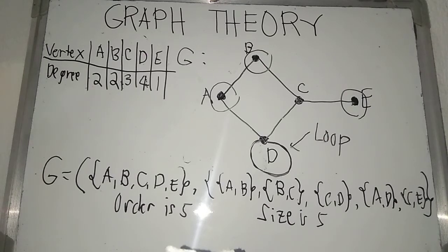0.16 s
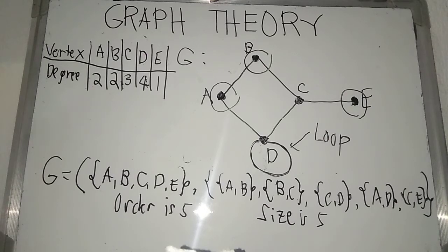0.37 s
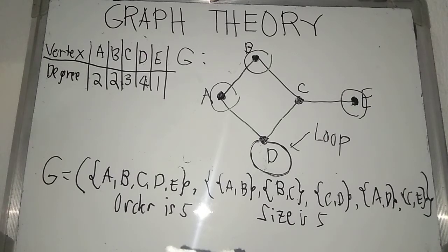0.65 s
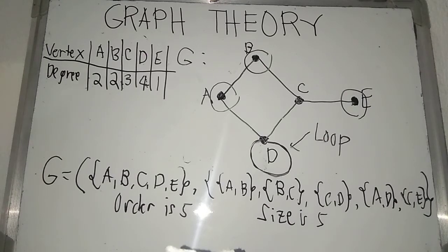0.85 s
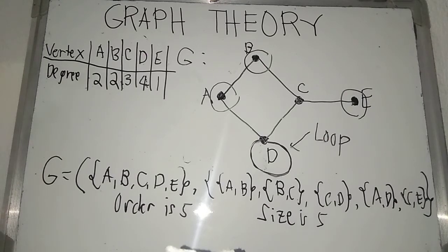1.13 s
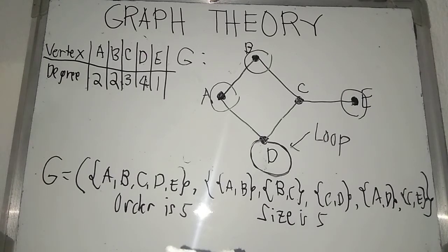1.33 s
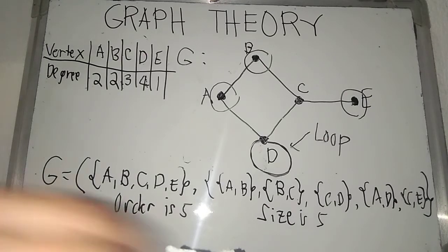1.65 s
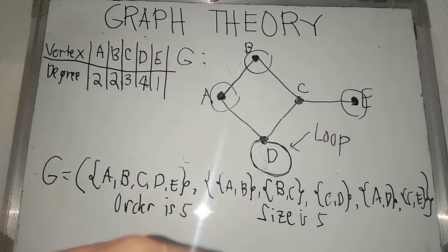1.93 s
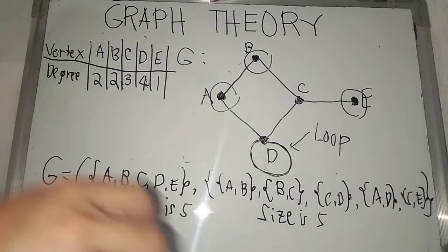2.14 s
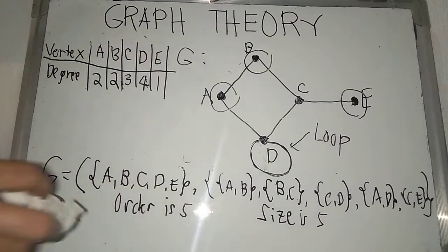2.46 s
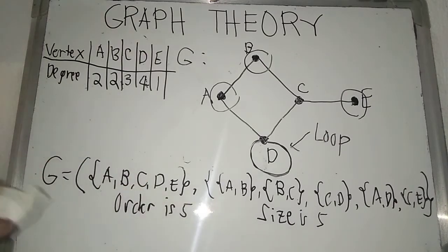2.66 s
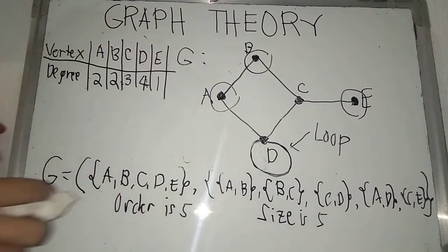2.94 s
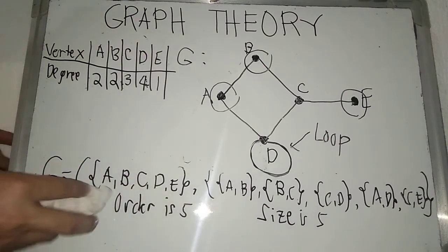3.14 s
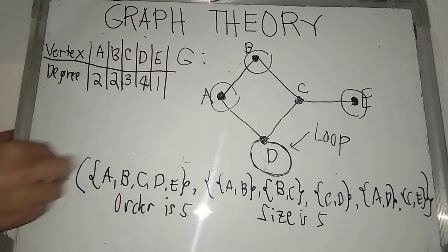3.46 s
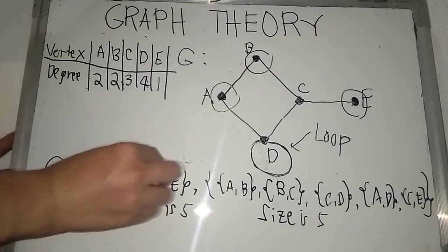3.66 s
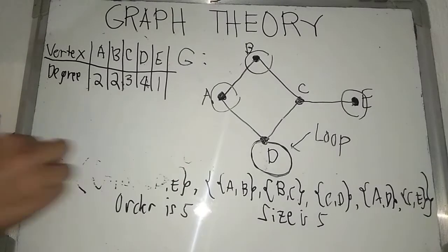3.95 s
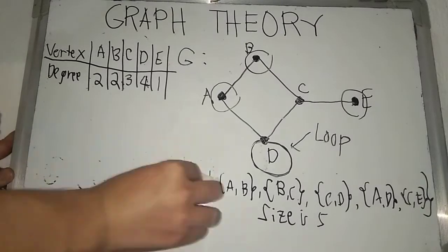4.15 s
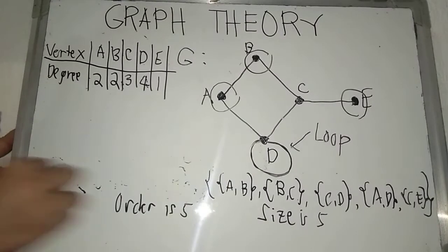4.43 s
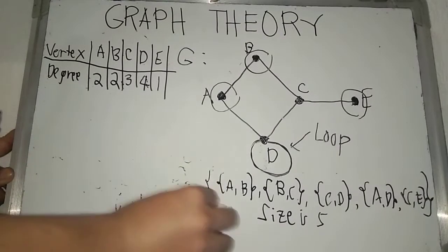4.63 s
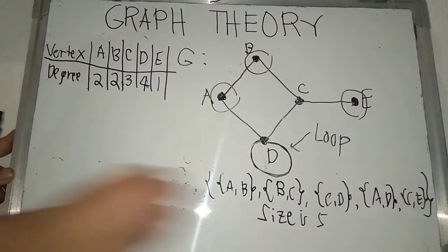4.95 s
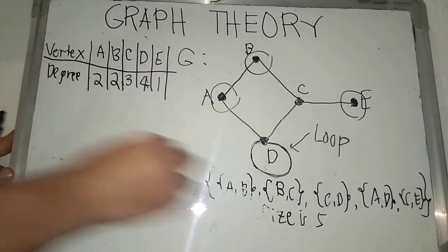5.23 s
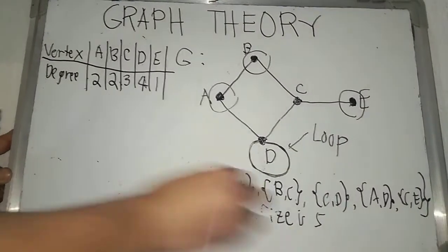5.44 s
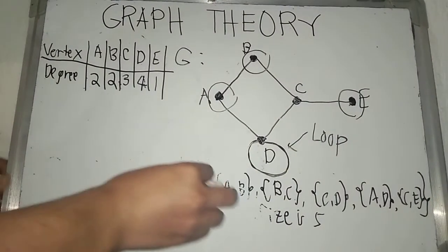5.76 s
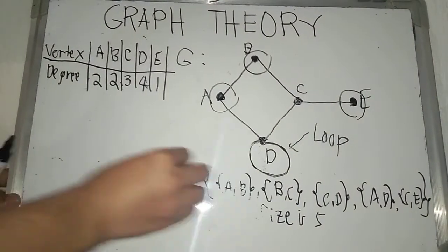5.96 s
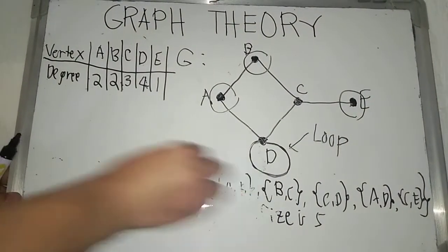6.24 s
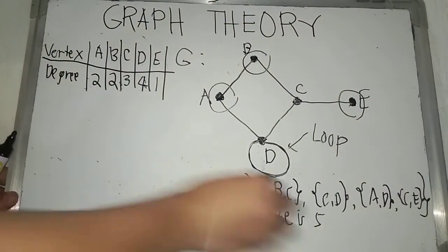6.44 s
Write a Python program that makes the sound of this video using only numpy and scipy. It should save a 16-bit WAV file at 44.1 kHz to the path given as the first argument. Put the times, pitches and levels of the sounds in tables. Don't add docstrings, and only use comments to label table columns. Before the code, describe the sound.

Low electrical hum throbs in a small room while a hand wipes a board with papery hisses, faint squeaks and light taps.

```python
import sys
import numpy as np
from scipy import signal
from scipy.fft import rfft, irfft, next_fast_len
from scipy.io import wavfile
from scipy.ndimage import uniform_filter1d, map_coordinates

SR = 44100
rng = np.random.default_rng(int(sys.argv[2]) if len(sys.argv) > 2 else 0)


def output_pcm(signal):
    pcm = np.clip(np.atleast_2d(signal).T, -1, 1) * 32767
    wavfile.write(sys.argv[1], SR, np.round(pcm).astype(np.int16))


def invert_db(x):
    u = np.asarray(x, float) / 20
    return 10 ** u


N = 290663


def unit(x):
    return x / np.sqrt(np.mean(x ** 2) + 1e-20)


def curves(rows):
    s, *cols = np.transpose(rows)
    return [np.interp(np.arange(N) / SR, s, c) for c in cols]


def along(points, hz):
    f, v = np.transpose(points)
    return np.interp(np.log(hz + 1), np.log(f + 1), v)


def coloured(x, points):
    m = next_fast_len(N + 8192)
    gain = invert_db(along(points, np.fft.rfftfreq(m, 1 / SR)))
    return irfft(rfft(x, m) * gain, m)[:N]


def wobble(rate_hz):
    knots = rng.standard_normal(int(N * rate_hz / SR) + 4)
    return map_coordinates(knots, [np.arange(N) * rate_hz / SR])


def rush(spectrum, patchy_db, grain_db):
    grainy = rng.standard_normal(N) * invert_db(grain_db * wobble(900))
    z = signal.stft(grainy, nperseg=512)[2]
    field = uniform_filter1d(rng.standard_normal(z.shape), size=6, axis=0)
    field = uniform_filter1d(field, size=8, axis=1)
    patchy = signal.istft(z * invert_db(patchy_db * unit(field)), nperseg=512)[1][:N]
    return unit(coloured(patchy, spectrum))


def ring(t, hz, db, t60_s):
    return invert_db(db - 60 * t / t60_s) * np.sin(2 * np.pi * hz * t)


def add(track, s, x):
    track[round(s * SR):][:len(x)] += x


# (time [s], length [s], hiss [dB], scrape over hiss [dB])
FOLDS = [(.1, 0.44, -70.5, -5), (1.305, 0.23, -72, -2), (1.917, 0.1, -60, -8), (1.967, .13, -56.5, -4),
         (2.04, .09, -66, -1), (2.137, 0.12, -59, -2), (2.244, 0.14, -64.5, -5), (2.402, 0.2, -64, -1.5),
         (2.633, .14, -60.5, -5.5), (2.675, 0.29, -71, 12.5), (2.79, 0.14, -58, -19),
         (2.931, 0.16, -61.5, -2.5), (3.064, 0.28, -65, -4.5), (5.5, 0.5, -73, -2),
         (5.705, 0.06, -63.5, -6), (5.752, 0.088, -63, 0), (5.885, .09, -64, -2)]
# (time [s], length [s], hiss [dB], scrape over hiss [dB])
STROKES = [(3.29, 0.24, -59, -4), (3.502, 0.26, -54.5, -2), (3.748, 0.24, -58, -3.5),
           (3.982, 0.23, -53, -2.5), (4.217, 0.24, -57, -3.5), (4.453, 0.23, -53.5, -4.5),
           (4.668, 0.25, -58, -1.5), (4.897, 0.27, -55.5, -3.5), (5.148, 0.2, -57, -6),
           (5.363, 0.11, -57.5, -6.5), (5.993, 0.2, -56.5, -2), (6.191, 0.16, -57.5, -5),
           (6.346, 0.21, -56.5, -6.5)]
# (time [s], scrape [dB], drone [dB])
JOLTS = [(1.98, -61.5, -70), (2.04, -63, -65), (2.17, -68, -70), (3.44, -59.5, -70), (3.55, -75, -66),
         (3.72, -55.5, -59.5), (3.96, -56, -62.5), (4.67, -60, -73), (4.895, -68, -63), (4.2, -65, -65),
         (5.13, -62.5, -66), (5.45, -69, -61.5), (5.8, -68, -64.5), (5.97, -62, -57), (6.54, -63.5, -63)]
# (time [s], drone [dB])
LEAN = [(0, -80), (3.3, -73.5), (3.6, -72.5), (4.9, -73.5), (5.05, -63), (5.3, -64), (5.5, -70.5),
        (5.7, -72.5), (6.59, -70.5)]
# (hiss [dB], scrape [dB], drone [dB])
IDLE_DB = (-79.5, -73.5, -78)


def effort():
    late, hiss_round, scrape_round = 1.14, 0.59, 0.45
    rise_s, jolt_t60_s, blur_s = 0.014, 0.32, 0.02
    hiss, scrape, drone = invert_db(IDLE_DB)[:, None] ** 2 * np.ones(N + SR)
    for s, length_s, db, scrape_db in FOLDS + STROKES:
        u = np.linspace(0, 1, round(length_s * SR))
        speed = np.sin(np.pi * u ** late) ** 2
        add(hiss, s, invert_db(db) ** 2 * speed ** hiss_round)
        add(scrape, s, invert_db(db + scrape_db) ** 2 * speed ** scrape_round)
    age = np.arange(SR // 2) / SR
    drag = ((1 - np.exp(-age / rise_s)) * invert_db(-60 * age / jolt_t60_s)) ** 2
    for s, scrape_db, drone_db in JOLTS:
        add(scrape, s, invert_db(scrape_db + 7.5) ** 2 * drag)
        add(drone, s, invert_db(drone_db + 4.5) ** 2 * drag)
    hiss, scrape = np.abs(uniform_filter1d(np.array([hiss, scrape]), size=round(blur_s * SR), axis=1))
    return hiss[:N], scrape[:N], drone[:N] + invert_db(curves(LEAN)[0]) ** 2


# (frequency [Hz], density [dB/Hz])
TISSUE_SPECTRUM = [(2500, -25), (4000, -6.5), (5000, -4.5), (6500, -0.5), (9000, -2), (12000, -15),
                   (16000, -7.5)]
FIZZ_SPECTRUM = [(6000, -24), (8500, -5), (11000, 4), (16000, -3)]
SCRAPE_SPECTRUM = [(600, -14), (1100, -5.5), (1800, -1.5), (3000, -1.5), (4200, -4.5), (6000, -20)]
DRONE_SPECTRUM = [(150, -40), (300, 1.5), (500, 0.5), (900, -6.5), (1500, -16.5)]


def wiping():
    hiss_db, scrape_db, drone_db = 10 * np.log10(effort())
    flutter = wobble(25)
    flutter_db = 0.7
    fizz_db = 1.6 * (hiss_db + 55) - 65.0
    hiss = invert_db(hiss_db + 2.5 + flutter_db * flutter) * rush(TISSUE_SPECTRUM, patchy_db=1.4, grain_db=1.5)
    scrape = invert_db(scrape_db - 2.97 + 0.32 * flutter) * rush(SCRAPE_SPECTRUM, patchy_db=2.0, grain_db=1.5)
    fizz = invert_db(fizz_db + flutter_db * flutter) * rush(FIZZ_SPECTRUM, patchy_db=2, grain_db=1.5)
    drone = invert_db(drone_db + 3.5 + 0.87 * flutter) * rush(DRONE_SPECTRUM, patchy_db=2.0, grain_db=1.0)
    return hiss + fizz + scrape + drone


# (time [s], length [s], first slip rate [Hz], last slip rate [Hz], level [dB])
WHISTLES = [(3.434, 0.016, 865, 830, -61), (3.462, 0.012, 844, 1340, -61.5),
            (3.7205, 0.006, 1790, 1680, -42.5), (3.7225, 0.0088, 1150, 1180, -42),
            (3.724, .005, 3430, 3900, -49), (3.986, .006, 1460, 1540, -44),
            (4.463, .011, 1900, 1960, -42.5), (4.474, .012, 1925, 1805, -48),
            (4.485, 0.025, 1795, 1950, -54.5), (4.512, 0.043, 1905, 1790, -62),
            (5.958, 0.01, 825, 730, -46.5), (6.366, 0.011, 1000, 1430, -65),
            (6.543, 0.012, 1590, 1060, -57.5)]
BUZZES = [(3.722, 0.0072, 513, 452, -40.5), (3.952, 0.011, 806, 723, -45), (3.981, 0.013, 708, 1430, -50),
          (4.46, .01, 1556, 1960, -44.5), (4.918, 0.011, 1460, 1300, -55), (5.966, 0.014, 654, 399, -46)]
CHIRPS = [(3.450, 0.0253, 5080, 5050, -56), (4.6, .015, 4800, 4600, -54), (3.452, 0.018, 5500, 3700, -58),
          (3.46, .020, 3930, 3890, -60.5), (5.963, 0.0126, 3620, 3400, -53.5),
          (5.966, .012, 2000, 1880, -59), (3.955, 0.015, 1850, 1800, -54.5),
          (3.975, 0.0205, 1400, 1400, -58), (3.745, .012, 4100, 4200, -60)]


def squeak(length_s, first_hz, last_hz, db, fall_db, jitter_share):
    u = np.linspace(0, 1, max(round(length_s * SR), 8))
    noise = uniform_filter1d(rng.standard_normal((2, 4000)), size=40, axis=1)
    jitter, lumps = noise[:, :len(u)] * np.sqrt(40)
    glide_hz = first_hz + (last_hz - first_hz) * u ** 0.667
    slip_hz = glide_hz * (1 + jitter_share * (jitter - jitter.mean()))
    phase = 2 * np.pi * np.cumsum(slip_hz) / SR
    k = np.arange(1, 9)[:, None]
    fall = np.maximum(fall_db * (k - 1), np.square(k - 2.5) * (k > 3))
    tones = invert_db(-fall) * np.sin(k * phase + 0.26 * k * k) * (k * first_hz < 9000)
    return invert_db(db + 1.9 * lumps) * unit(tones.sum(axis=0)) * np.sin(np.pi * u) ** 0.72


def squeaks():
    out = np.zeros(N + SR)
    # (bursts, fall per overtone [dB], jitter as share of the slip rate)
    for rows, fall_db, jitter_share in [(WHISTLES, 11.5, 0.025), (BUZZES, 3, 0.025), (CHIRPS, 11.5, 0.06)]:
        for s, length_s, first_hz, last_hz, db in rows:
            add(out, s, squeak(length_s, first_hz, last_hz, db, fall_db, jitter_share))
    return out[:N]


# (time [s], peak [dB], crack [Hz], ring [Hz], ring level [dB])
TICKS = [(1.4746, -56, 900, 465, 2), (1.475, -45.5, 3700, 610, -8), (2.158, -63, 6300, 840, 9),
         (4.6685, -36.5, 1600, 1530, 2.5), (4.6697, -25.5, 2270, 980, -4), (4.682, -43.5, 2510, 590, 2.5),
         (4.8970, -33.5, 1290, 1030, -5), (5.183, -46, 2500, 520, -2), (5.2063, -41, 2200, 456, -2),
         (5.230, -39.5, 2200, 1150, -7), (5.340, -54, 3000, 470, 5), (5.371, -55, 3000, 540, -3),
         (5.455, -44, 1070, 545, 0.5), (5.616, -54, 2490, 520, 4), (5.812, -52, 1000, 450, 0),
         (5.974, -35.5, 4500, 450, 1), (6.443, -52, 1800, 980, 2.5), (6.549, -56.5, 900, 550, 10)]
# (time [s], peak [dB], crack [Hz])
SNAPS = [(0.3253, -41.5, 5000), (2.4205, -46.5, 3113), (3.002, -51, 1700), (4.8949, -32, 2350),
         (5.206, -39, 4500), (5.231, -41, 5500), (5.726, -39, 2170), (5.727, -33, 6800),
         (5.8094, -31, 5900), (6.214, -49, 3000)]


def ticks():
    out, t = np.zeros(N + SR), np.arange(SR // 5) / SR
    snaps = [(s, db, crack_hz, 0.65 * crack_hz, -22) for s, db, crack_hz in SNAPS]
    for s, db, crack_hz, ring_hz, ring_db in TICKS + snaps:
        crack = ring(t, crack_hz, db + 8, 3.3 / crack_hz) * (1 - np.exp(-t * crack_hz * 3.4))
        tail = ring(t, ring_hz, db + ring_db, 0.016) * (1 - np.exp(-t / 0.00042))
        add(out, s, crack + tail)
    return out[:N]


# (time [s], level [dB])
CLICKS = [
    (1.9796, -25.5),
    (1.9821, -33),
]
# (frequency [Hz], level [dB], t60 [s])
CAP_MODES = [(4300, -28, .045), (3970, -24, 0.084), (4320, -13, .003), (3700, -5, 0.0037),
             (5700, -8.5, 0.0099), (7070, 1, 0.0042), (10100, -1, .004), (12000, -11, 0.0026),
             (15000, -16, 0.0044)]


def cap_clicks():
    out, t = np.zeros(N + SR), np.arange(SR // 5) / SR
    click = sum((-1) ** k * ring(t, hz, db, t60_s) for k, (hz, db, t60_s) in enumerate(CAP_MODES))
    for s, db in CLICKS:
        add(out, s, invert_db(db) * click * (1 - np.exp(-t / 0.000084)))
    return out[:N]


# (time [s], level [dB], frequency [Hz], t60 [s])
THUDS = [(3.56, -50.5, 150, 0.35), (3.576, -48, 205, 0.16), (3.578, -51, 305, 0.069),
         (3.579, -48.5, 420, 0.064), (5.62, -51, 149, 0.27), (5.98, -52, 446, 0.076),
         (3.73, -58, 450, .096), (3.727, -51.5, 740, 0.095), (5.79, -62, 246, 0.16)]


def thuds():
    out, t = np.zeros(N + SR), np.arange(SR // 5) / SR
    for s, db, hz, t60_s in THUDS:
        band = signal.butter(2, [hz / 1.18, hz * 1.3], "band", fs=SR, output="sos")
        shudder = unit(signal.sosfilt(band, rng.standard_normal(len(t))))
        envelope = invert_db(db + 7.0 - 60 * t / t60_s) * (1 - np.exp(-t / 0.014))
        add(out, s, (0.5 * shudder + np.sin(2 * np.pi * hz * t)) * envelope)
    return out[:N]


# (frequency [Hz], width [Hz], level [dB])
BOARD_MODES = [(450, 95, -6.5), (545, 15, 0.5), (1150, 49, -26)]


def board(x):
    m = next_fast_len(N + 8192)
    f = np.fft.rfftfreq(m, 1 / SR)
    modes = sum(invert_db(db) * 1j * f * w / (c * c - f * f + 1j * f * w) for c, w, db in BOARD_MODES)
    return irfft(rfft(x, m) * (1 + modes), m)[:N]


# (time [s], level [dB])
WALLS = [(.004, -8.5), (.011, -16.5), (.021, -17), (.026, -12)]
# (frequency [Hz], t60 [s])
ROOM_T60 = [(300, 0.4), (2000, 0.22), (8000, 0.6)]


def room(x):
    hz, t, z = signal.stft(rng.standard_normal(SR // 2), SR, nperseg=256)
    decay = invert_db(-60 * t / along(ROOM_T60, hz)[:, None])
    tail = signal.istft(z * decay, SR, nperseg=256)[1]
    answer = np.pad(invert_db(-6.5) * tail / np.linalg.norm(tail), (round(0.004 * SR), 0))
    for s, db in WALLS:
        scatter = rng.standard_normal(SR // 200) * np.hanning(SR // 200)
        add(answer, s, invert_db(db) * scatter / np.linalg.norm(scatter))
    reflected = signal.fftconvolve(x, answer)[:N]
    return x + coloured(reflected, [(200, 1.5), (3000, -4), (8000, -11.0)])


# (time [s], level [dB])
HUM_LEVEL = [(0, -48.5), (.9, -48.5), (1.4, -47), (2.2, -48.5), (2.9, -47), (3.6, -48.5), (5.2, -48),
             (5.9, -49), (6.59, -48)]
# (hum multiple, level [dB])
OVERTONES = [(1, 0), (2, -18), (3, -16.6)]
# (hum multiple, slip multiple, level [dB])
SIDEBANDS = [(1, -1, -15.5), (1, 1, -14), (1, 2, -23.5), (1, 3, -21.5), (1, 6, -26), (2, -3, -29),
             (2, -2, -26), (2, -1, -27), (2, 3, -31)]


def motor_hum():
    hum_hz, slip_hz = 120.41, 4.014
    crest_s, wow_rad = 0.11, -1.15
    db, = curves(HUM_LEVEL)
    t = np.arange(N) / SR
    phase = 2 * np.pi * hum_hz * t
    slip = 2 * np.pi * slip_hz * (t - crest_s)
    hum = sum(invert_db(level + 0.5 * wobble(3)) * np.sin(k * phase + 0.9 * k) for k, level in OVERTONES)
    hum += sum(invert_db(level) * np.sin(k * phase + 0.9 * k + j * slip + wow_rad) for k, j, level in SIDEBANDS)
    return np.sqrt(2) * invert_db(db) * hum


# (frequency [Hz], density [dB/Hz])
RUMBLE_SPECTRUM = [(15, -61), (45, -48), (75, -27), (105, -26.5), (190, -34.5), (340, -35), (420, -50),
                   (600, -55)]
# (frequency [Hz], half width [Hz], level [dB])
CASING = [(145.5, 16.4, 9.5), (235.6, 17.6, 14), (275.7, 7.2, 7.5), (309.5, 3.5, 8.5)]


def motor_rumble():
    hz = np.arange(15, 600, 2.)
    casing_db = sum(top_db / (1 + ((hz - c) / w) ** 2) for c, w, top_db in CASING)
    spectrum = np.transpose([hz, along(RUMBLE_SPECTRUM, hz) + casing_db])
    return invert_db(-58) * rush(spectrum, patchy_db=1.2, grain_db=1.9)


# (frequency [Hz], density [dB/Hz])
AIR_SPECTRUM = [(200, 1.5), (450, -5), (700, -4), (1800, -4), (3500, -12), (6500, -17.5), (12000, -2),
                (16000, -4)]


def room_air():
    return invert_db(-65.5) * rush(AIR_SPECTRUM, patchy_db=-2.0, grain_db=1.5)


def scene():
    contacts = squeaks() + ticks() + cap_clicks() + thuds()
    background = motor_hum() + motor_rumble() + room_air()
    return np.tile(wiping() + room(board(contacts)) + background, (2, 1))


def roll_off(x):
    return signal.sosfilt(signal.butter(12, 16380, fs=SR, output="sos"), x)


# (frequency [Hz], level [dB])
MIC = [(100, 0), (5000, 1.5), (6800, 2), (7600, -4), (8500, -15.5), (10000, -17.5), (12500, -23.5),
       (15500, -19)]


def record(dry):
    top_hz = 15500
    sound = coloured(coloured(dry[0], MIC), [(top_hz - 20, 0), (top_hz, -120)])
    mix = np.tile(sound, (2, 1))
    return roll_off(mix)


dry = scene()
out = record(dry)
output_pcm(out)
```